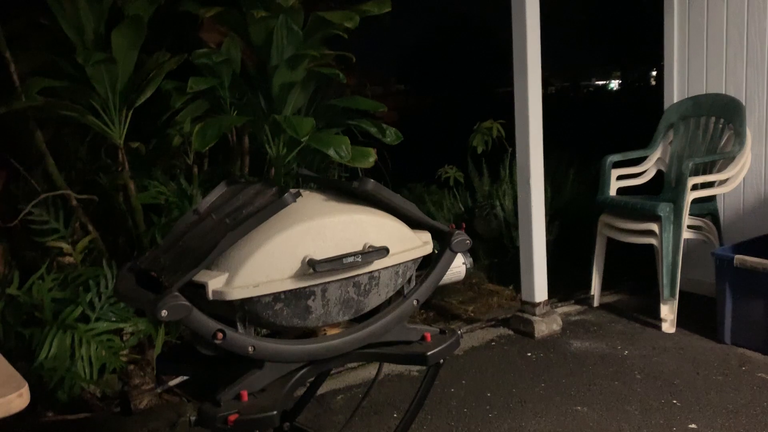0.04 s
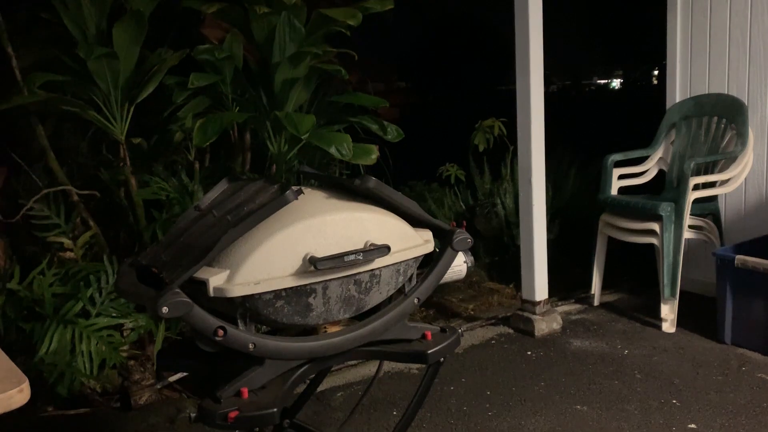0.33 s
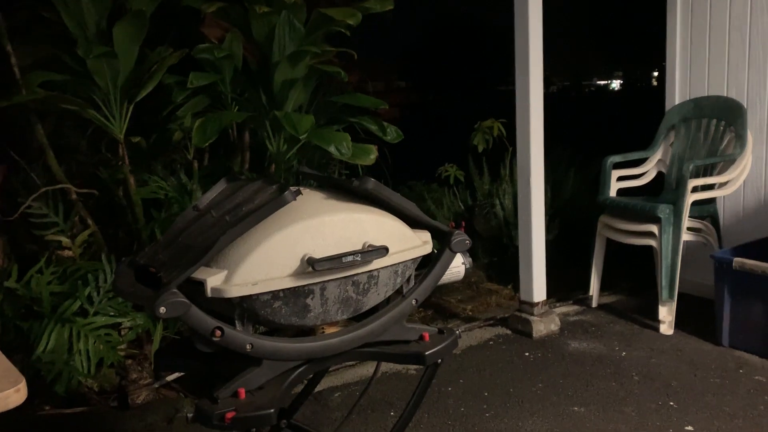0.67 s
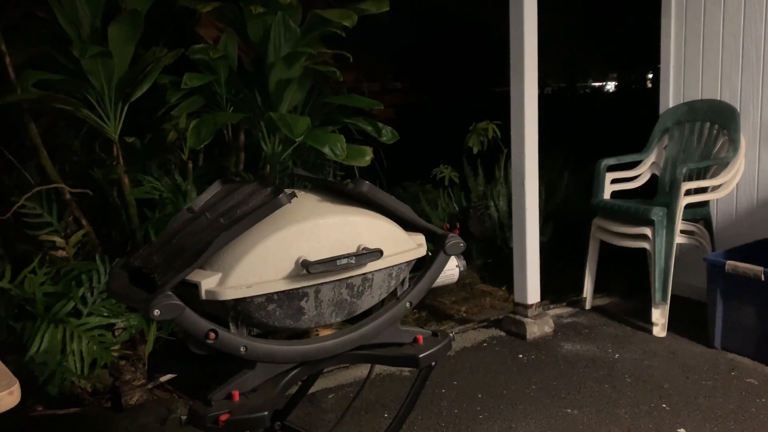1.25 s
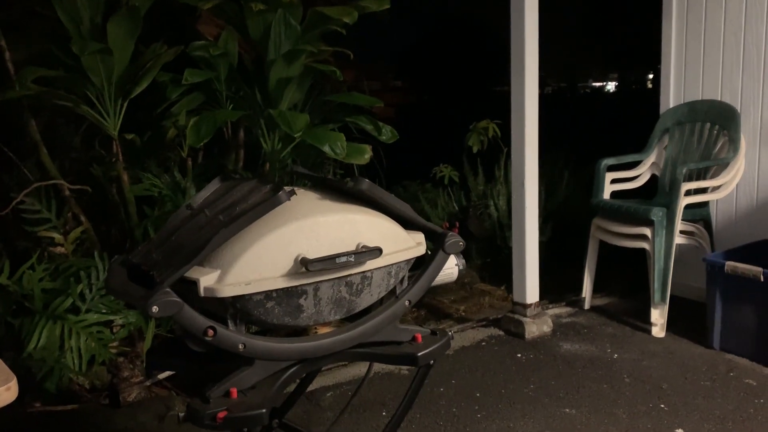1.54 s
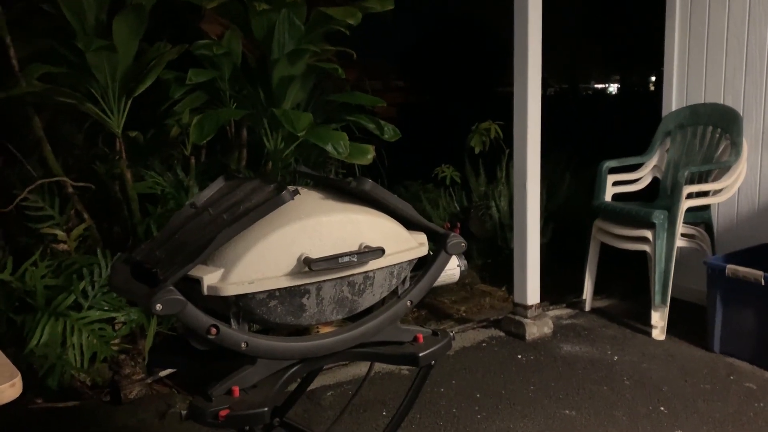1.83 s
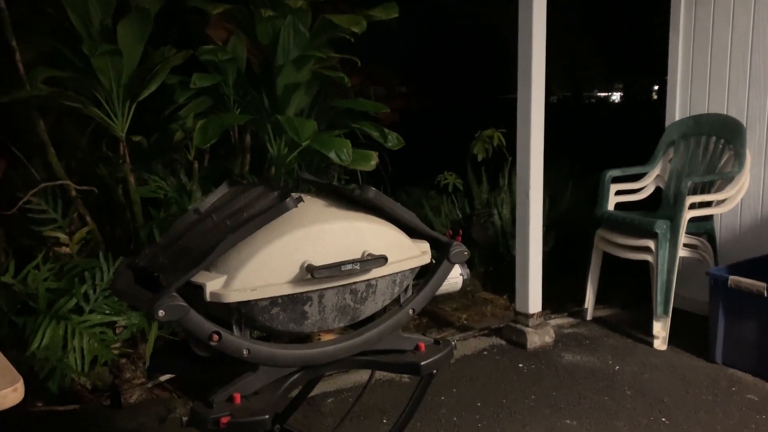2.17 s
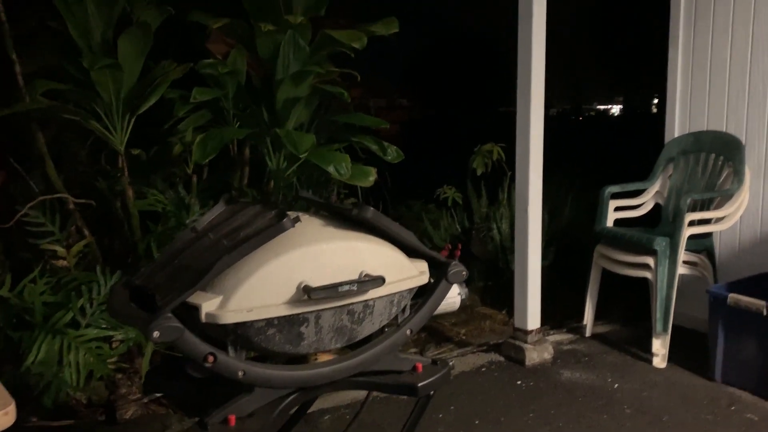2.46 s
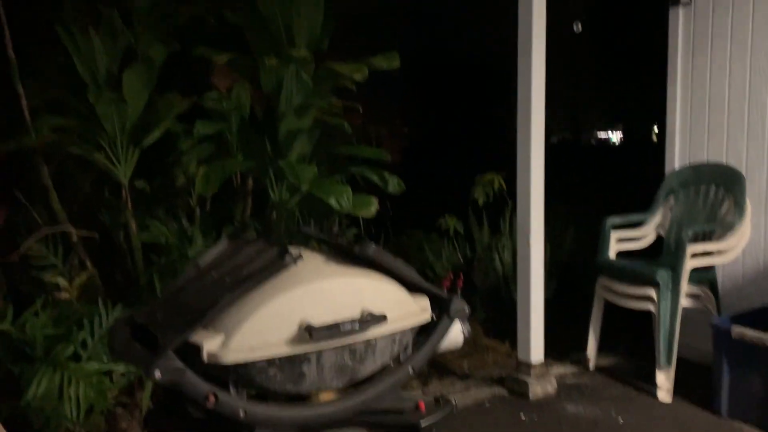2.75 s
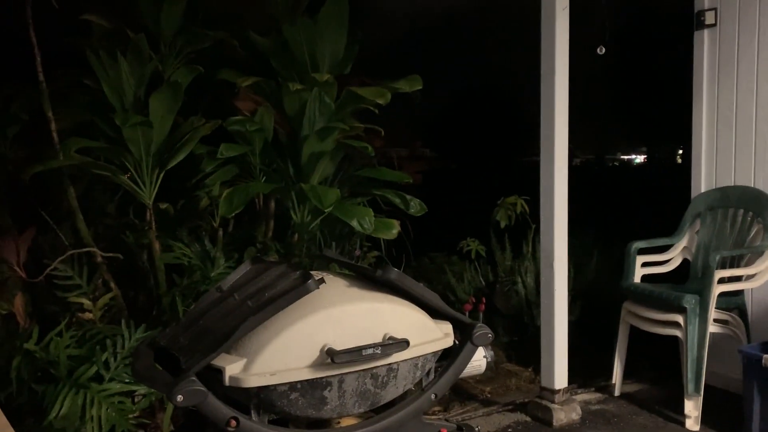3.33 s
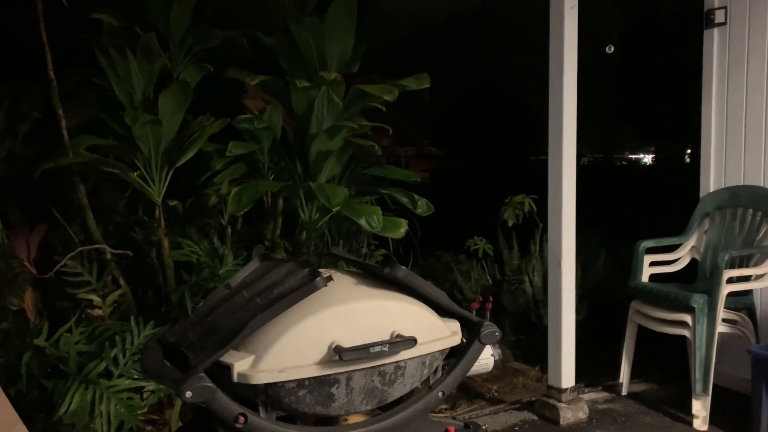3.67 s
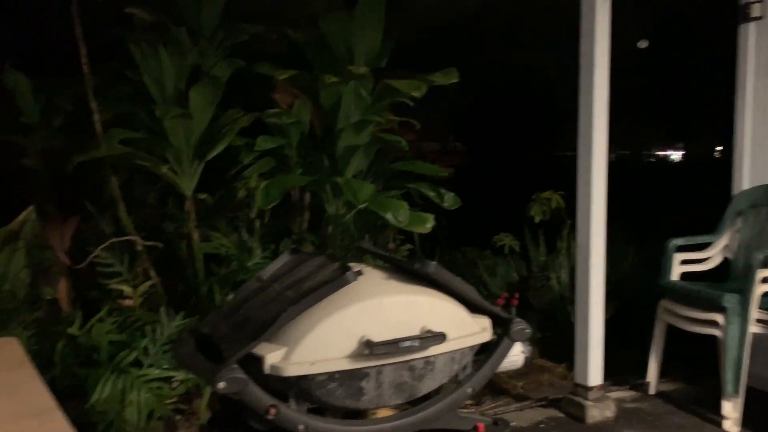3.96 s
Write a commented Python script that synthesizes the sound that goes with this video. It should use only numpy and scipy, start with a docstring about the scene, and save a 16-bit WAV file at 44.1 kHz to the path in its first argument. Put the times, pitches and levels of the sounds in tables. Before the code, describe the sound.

Tree frogs call throughout from garden plants near a porch at night, each giving a low whistle then a higher rising one. The calls overlap above a distant frog chorus, very faint insects and a soft low rumble.

```python
"""Whistled "co-qui" calls of tree frogs, close by in wet garden foliage at night; stereo from a porch.
Each frog whistles a nearly level low "co" and then a rising "qui"; leaves scatter the notes
and leave a short tail. Farther off lie a frog chorus, a thin band of insects, a few drips,
faint hums and a low rumble."""
import sys
import numpy as np
from scipy import signal
from scipy.fft import rfft, irfft
from scipy.io import wavfile

SR = 44100
rng = np.random.default_rng(int(sys.argv[2]) if len(sys.argv) > 2 else 0)


def bounce(signal):
    """Save signal as a 16-bit WAV file at the path given by the first command-line argument."""
    frames = np.transpose(np.atleast_2d(signal))
    limited = np.clip(frames, -1, 1)
    pcm = np.round(limited * 32767).astype(np.int16)
    wavfile.write(sys.argv[1], SR, pcm)


N = 176400
T = np.arange(N) / SR
FREQS = np.fft.rfftfreq(N, 1 / SR)


def from_db(db):
    """Decibels to gain."""
    return 10 ** (np.asarray(db) / 20)


def rms_one(x):
    """Scale to rms 1."""
    return x / np.sqrt(np.mean(x ** 2) + 1e-20)


def over_freqs(points):
    """Spread (f/Hz, value) points over the spectrum on a log-frequency axis."""
    hz, values = np.array(points).T
    return np.interp(np.log(FREQS + 1e-9), np.log(hz), values)


def drift(rate_hz):
    """A random wander of rms 1, mostly slower than rate_hz."""
    return rms_one(irfft(rfft(rng.standard_normal(N)) / (1 + (FREQS / rate_hz) ** 2), N))


def ramp(x):
    """Smooth step from 0 to 1."""
    return np.sin(np.pi / 2 * np.clip(x, 0, 1)) ** 2


def add(out, start_s, sound):
    """Mix a stereo sound in at start_s."""
    i = int(start_s * SR)
    a, b = max(i, 0), min(i + sound.shape[1], N)
    if b > a:
        out[:, a:b] += sound[:, a - i:b - i]


def rumble_and_hiss():
    """A far rumble, alike in both channels, thinning to a diffuse hiss."""
    # spectrum of the rumble and hiss, with a deep notch near 10.5 kHz: f/Hz, relative density/dB
    spectrum = [(20, -6), (40, -3), (60, -2.5), (78, -8), (110, -4.5), (155, -12.5), (195, -12.5),
                (280, -16), (500, -22), (1200, -25), (2100, -31.5), (3800, -48.5), (8500, -53.5),
                (10500, -73.5), (12500, -53), (15000, -61)]
    # likeness of the channels: f/Hz, left-right correlation
    likeness = [(50, 0.98), (125, 0.84), (250, 0.22), (500, 0.12), (2000, -0.18), (10000, -0.38)]
    low_cut = FREQS / np.hypot(FREQS, 20)
    mid, side = rfft(rng.standard_normal((2, N))) * from_db(over_freqs(spectrum)) * low_cut
    alike = over_freqs(likeness)
    bed = rms_one(irfft(np.sqrt(1 + alike) * mid + np.sqrt(1 - alike) * side * [[1], [-1]], N))
    return from_db(-49.5 + drift(2.4)) * bed  # sways by about 1 dB


def hums(waver=.7, fade_s=.73):
    """Faint low tones in the centre that waver in level and pitch."""
    # hum tones: f/Hz, level/dB, faded out by t/s
    tones = [(61.6, -53, 9), (199.4, -60, 2.3)]
    out = 0
    for hz, db, end in tones:
        wavering = 1 + waver * (drift(12) + 1j * drift(12))
        tone = np.real(wavering * np.exp(2j * np.pi * hz * T))
        out += from_db(db) * rms_one(tone) * ramp((end - T) / fade_s)
    return out


def insects(flutter_db=3, flutter_hz=13):
    """Far insects blur into a narrow, fluttering band."""
    # insect band: centre f/Hz, width/Hz, level/dB
    bands = [(6250, 290, -71)]
    out = 0
    for hz, width_hz, db in bands:
        band = irfft(rfft(rng.standard_normal((2, N))) / (1 + ((FREQS - hz) / width_hz) ** 2) ** 2, N)
        out += from_db(db) * rms_one(band * from_db(flutter_db * drift(flutter_hz)))
    return out


def drips(t60_s=.18, width_octaves=.56):
    """Drops splash faintly on leaves, each a dying burst of band-limited noise."""
    # splashes: t/s, level before the band filter/dB, centre f/Hz
    splashes = [(1.018, -74, 11000), (1.788, -49.5, 5000), (2.22, -76, 11100), (2.502, -71, 9720),
                (3.298, -57.5, 4530)]
    out, t = np.zeros((2, N)), T[:SR // 4]
    for start, db, hz in splashes:
        edges_hz = hz * 2 ** (width_octaves * np.array([-.5, .5]))
        band = signal.butter(2, edges_hz, "band", fs=SR, output="sos")
        splash = from_db(db - 60 * t / t60_s) * rng.standard_normal((2, len(t)))
        add(out, start, signal.sosfilt(band, splash))
    return out


def foliage(note, scatter_db, pan_db=0, lag_ms=0):
    """From perch to microphone: direct sound, leaf scatter and the garden's tail; energy is kept."""
    t = T[:SR * 3 // 5]
    depth = from_db(.56 * scatter_db)  # deeper in the foliage, scatter lasts longer and the tail grows
    leaves_t60_s, garden_t60_s, first_echo_s = .19 * depth, .76, .0023
    leaves, garden = (
        rms_one(rng.standard_normal((2, len(t))) * from_db(-60 * t / t60) * (t > first_echo_s))
        for t60 in (leaves_t60_s, garden_t60_s))
    path = from_db(scatter_db) * (leaves + depth * from_db(-5.5) * garden) / np.sqrt(len(t))
    side = np.array([[1], [-1]])
    path[:, :88] += np.sinc(np.arange(88) - 44 + side * lag_ms * SR / 2000)  # direct sound
    heard = signal.fftconvolve(note[None], path, axes=1) * from_db(side * pan_db / 2)
    return heard * np.sqrt(2 * np.sum(note ** 2) / np.sum(heard ** 2))


def whistle(hz, t, overtones, wobble_share=.0044, wobbles_per_s=159.6):
    """A frog's nearly pure, slightly wobbling tone; overtones build up as the vocal sac fills."""
    wobble = np.interp(t * wobbles_per_s, np.arange(64), rng.standard_normal(64))
    phase = 2 * np.pi * np.cumsum(hz * (1 + wobble_share * wobble)) / SR
    upper = sum(from_db(db - fade * t) * np.sin(k * phase) for k, db, fade in overtones)
    return np.sqrt(2) * (np.sin(phase) + ramp(t / .03) * upper)


def co(length, hz, sag_hz_per_s, scoop=0, overtones=()):
    """The low note scoops up to its pitch and sags a little."""
    attack_s, release_s, scoop_s = .022, .065, .011
    t = T[:int(length * SR)]
    pitch = (hz - sag_hz_per_s * t) * (1 - scoop * np.exp(-t / scoop_s))
    return whistle(pitch, t, overtones) * ramp(t / attack_s) * ramp((length - t) / release_s)


def qui(length, first_hz, last_hz, scoop=0, overtones=()):
    """The high note opens quickly, then swells while it glides up and levels off."""
    onset_s, swell_s, release_s, scoop_s, glide_s = .0066, .067, .012, .0068, .065
    t = T[:int(length * SR)]
    glide = np.expm1(-t / glide_s) / np.expm1(-length / glide_s)
    pitch = (first_hz + (last_hz - first_hz) * glide) * (1 - scoop * np.exp(-t / scoop_s))
    swell = .4 * ramp(t / onset_s) + .6 * ramp(t / swell_s)
    return whistle(pitch, t, overtones) * swell * ramp((length - t) / release_s)


def crowd(make_note, calls_per_s, perch_count=6):
    """Many frogs on a few far perches, each call at its own random time and pitch."""
    out, perches = np.zeros((2, N)), np.zeros((perch_count, N + 2 * SR))
    total = int(calls_per_s * (N / SR + 1))
    for k, (jitter, pitch) in enumerate(rng.random((total, 2))):
        note = make_note(np.sqrt(3) * (2 * pitch - 1))  # detune with a spread of 1
        i = int((k + jitter) / calls_per_s * SR)
        perches[k % perch_count, i:i + len(note)] += note
    for perch in perches:
        add(out, -1, foliage(perch, scatter_db=17.5))  # already under way for a second
    return rms_one(out)


def far_chorus(note_s=.13):
    """Frogs deep in the garden merge into two shimmering bands."""
    high = crowd(lambda detune: qui(note_s, 2514.5 + 170 * detune, 2943 + 170 * detune), calls_per_s=45)
    low = crowd(lambda detune: co(note_s, 1602.7 + 85 * detune, sag_hz_per_s=350), calls_per_s=30)
    return from_db(-52.5) * high + from_db(-56.5) * low


def near_frogs():
    """Frogs in the plants around the porch, each note reaching the microphone through leaves."""
    # low notes: t/s, length/s, f/Hz, level/dB, scoop/share of pitch, sag/(Hz/s), octave overtone/dB,
    # upper overtone boost/dB, left over right/dB, right lag/ms, scatter/dB
    co_notes = [ (0.285, .13, 1615, -44.5, 0.023, 300, -19, -7, 0, -0.13, -5),
                (0.344, 0.085, 1443, -46, 0.018, 607, -20, -3.5, 3, -0.13, 0.5),
                (0.549, 0.15, 1705, -48, .01, 916, -16.5, 0, -3, -0.16, 14.5),
                (0.952, 0.13, 1730, -53, 0.0078, 303, -18, 0, 8, -0.095, 1),
                (1.189, 0.14, 1623, -48.5, .01, 248, -17, -5.5, 2, -0.16, 6.5),
                (1.509, 0.072, 1674, -41.5, 0.012, 600, -17.5, -8, 3.5, -0.11, 0.5),
                (1.556, 0.18, 1593, -35.5, 0.014, 130, -9.5, -2, 3.5, 0.18, -5.5),
                (1.744, 0.13, 1884, -38, .14, 330, -4, 3.5, 2.5, -0.22, -4),
                (1.884, 0.14, 1565, -46.5, 0.012, 100, -12, -3.5, 0.5, 0.073, 5),
                (1.965, 0.13, 1717, -56, .01, 100, -16, -10.5, 16.5, 0.059, 3.5),
                (2.401, 0.19, 1614, -49, 0.0064, 180, -17.5, -2, 1.5, -0.15, -12),
                (2.685, 0.11, 1727, -47.5, 0.006, 690, -6, 0.5, 4, 0.28, 6.5),
                (2.746, 0.068, 1460, -40.5, 0.012, 510, -11, 5.5, 9, -.14, -2),
                (2.755, .11, 1555, -46, 0.0062, 612, -18, 12, 1, -0.19, 1.5),
                (2.756, 0.098, 1654, -48, 0.0085, 600, -8.5, 8.5, 5.5, 0.52, 5),
                (3.28, 0.13, 1516, -49, 0.011, 202, -14.5, 1.5, 7, 0.25, -4.5),
                (3.415, 0.13, 1647, -50, 0.0065, 306, -16.5, -3.5, 0.5, -0.19, -17),
                (3.601, 0.16, 1591, -32.5, 0.016, 153, -16.5, -3, 5, 0.27, -4.5),
                (3.794, 0.11, 1881, -39.5, 0.18, 253, -1, 0, 5.5, -0.14, -1.5), ]
    # high notes: t/s, length/s, first f/Hz, last f/Hz, level/dB, scoop/share of pitch,
    # overtone boost/dB, left over right/dB, right lag/ms, scatter/dB
    qui_notes = [ (.01, 0.083, 2756, 3140, -44.5, 0.03, -15, -0.5, 0, 13),
                 (0.161, 0.13, 2672, 3221, -37, 0.036, -10.5, -4, 0.14, 1.5),
                 (.48, .11, 2540, 2920, -49, 0.036, -15, 0.5, -0.033, 2.5),
                 (0.567, 0.098, 2260, 2642, -44, 0.013, -11.5, 1, -0.061, 2.5),
                 (0.794, 0.076, 2655, 3183, -33, 0.028, -23.5, 0, 0.18, 3),
                 (.92, .12, 2622, 3033, -48.5, 0.053, -27.5, 1, 0, 11),
                 (1.115, 0.042, 3055, 3213, -36, .02, -14, 1.5, 0.18, -9),
                 (1.195, 0.1, 2672, 3070, -46, 0.0079, -12.5, 3, 0, 10),
                 (1.439, 0.15, 2375, 3078, -41.5, .02, -13, -3, 0.14, -4),
                 (1.71, 0.078, 2180, 2767, -43, 0.018, -21, 1, 0.12, 8.5),
                 (1.78, 0.14, 2490, 3142, -28, 0.21, 2.5, -2, 0.15, 1),
                 (1.924, 0.15, 2658, 3332, -28, .02, -7, 4, 0.13, -8.5),
                 (2.109, 0.12, 2495, 2949, -37.5, 0.039, -16, 0.5, -0.16, 5),
                 (2.584, .14, 2644, 3133, -42, 0.031, -7, -0.5, 0.0096, 13),
                 (2.914, 0.12, 2713, 3080, -39.5, 0.031, -17.5, 7.5, -0.041, 7.5),
                 (2.946, 0.1, 2630, 3262, -35, 0.013, -21.5, 4, 0.14, -5),
                 (2.965, 0.096, 2235, 2790, -43, 0.045, -12.5, 1.5, -0.0024, 5),
                 (2.988, 0.13, 2643, 3109, -39, 0.023, -23, 3, 0.11, -4),
                 (3.308, 0.12, 2560, 3005, -46.5, 0.015, -24, 0, 0.066, 3.5),
                 (3.505, .13, 2110, 2615, -52.5, 0.013, -22.5, 3.5, 0.049, 4.5),
                 (3.643, 0.16, 2510, 3212, -38.5, 0.01, -8, 0.5, 0.096, -6.5),
                 (3.829, 0.15, 2546, 3120, -27.5, .18, 2, -0.5, 0.12, 0.5), ]
    # overtones of each kind of note: multiple of the pitch, relative level before boost/dB, fade/(dB/s)
    co_overtones = [(3, -31.5, 3), (4, -49, 4), (5, -50, 12), (6, -53.5, 1.5), (7, -58, -3)]
    qui_overtones = [(2, -32.5, 93), (3, -35, 150), (4, -35.5, 150)]
    out = np.zeros((2, N))
    for start, length, hz, db, scoop, sag, octave_db, boost_db, pan_db, lag_ms, scatter_db in co_notes:
        upper = [(k, level + boost_db, fade) for k, level, fade in co_overtones]
        note = co(length, hz, sag, scoop, [(2, octave_db, .0091)] + upper)
        add(out, start, from_db(db) * foliage(note, scatter_db, pan_db, lag_ms))
    for start, length, first_hz, last_hz, db, scoop, boost_db, pan_db, lag_ms, scatter_db in qui_notes:
        overtones = [(k, level + boost_db, fade) for k, level, fade in qui_overtones]
        note = qui(length, first_hz, last_hz, scoop, overtones)
        add(out, start, from_db(db) * foliage(note, scatter_db, pan_db, lag_ms))
    return out


def scene():
    """The night garden as heard from the porch."""
    return rumble_and_hiss() + hums() + insects() + drips() + near_frogs() + far_chorus()


def record(dry, start_s=.06, stopband_hz=17000):
    """The sound fades in quickly after a moment of silence; the top of the treble is cut."""
    high_cut = signal.cheby2(12, 70, stopband_hz, fs=SR, output="sos")
    return signal.sosfilt(high_cut, dry * ramp((T - start_s) / .005))


dry = scene()
out = record(dry)
bounce(out)
```